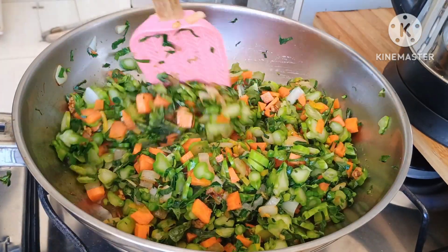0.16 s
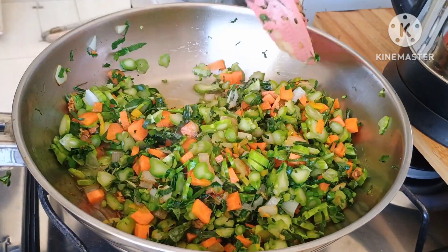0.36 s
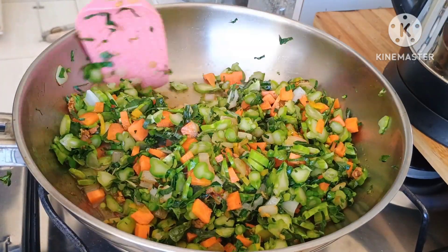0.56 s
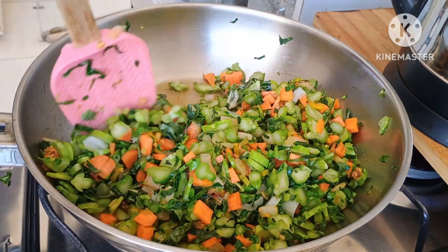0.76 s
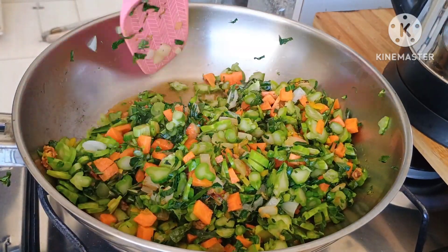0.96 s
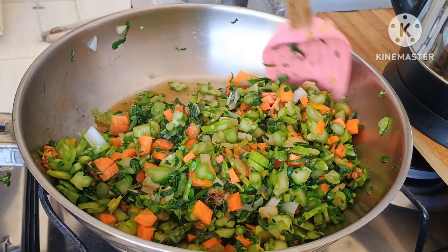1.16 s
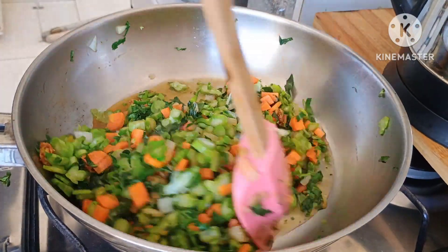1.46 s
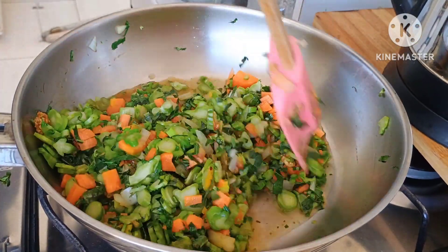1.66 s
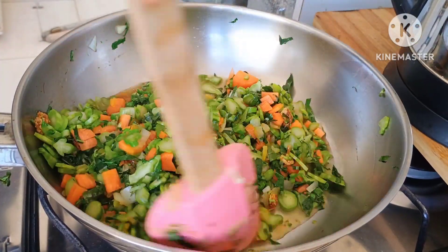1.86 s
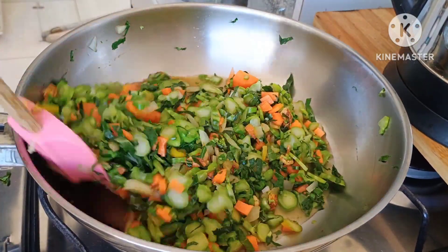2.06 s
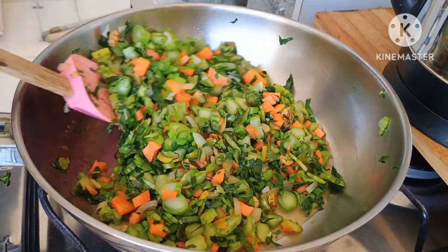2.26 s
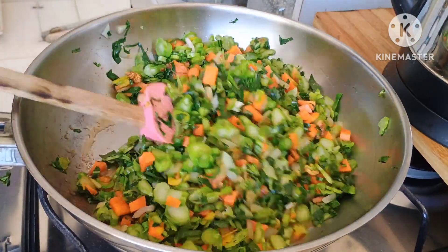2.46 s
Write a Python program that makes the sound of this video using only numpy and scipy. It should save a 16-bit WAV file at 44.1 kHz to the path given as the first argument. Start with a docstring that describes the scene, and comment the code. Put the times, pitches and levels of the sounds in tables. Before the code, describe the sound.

Water sizzling and spitting in a hot pan of vegetables, with a spatula stirring.

```python
"""Water sizzles in a hot steel pan of vegetables: steam bubbles burst, drops spit, the boiling surges. A
spatula turns the wet pieces, scrapes and knocks the steel, and then the sizzle dies away. The pan rings and
drones, and dull thuds sound as it bumps on its stand or the heap flops. Its wall and a small kitchen reflect
the sound into two close microphones, over quiet air and a wavering low hum."""
import sys
import numpy as np
from scipy import signal
from scipy.fft import rfft, irfft
from scipy.io import wavfile
from scipy.ndimage import uniform_filter1d

SR = 44100
rng = np.random.default_rng(int(sys.argv[2]) if len(sys.argv) > 2 else 0)


def wrap_up_sound(samples):
    """Save the sound to the file named by the first command line argument, as 16-bit audio."""
    columns = np.atleast_2d(samples).T
    # keep every value between -1 and 1, then stretch to whole-number steps
    tamed = np.clip(columns, -1, 1)
    steps = np.round(tamed * 32767).astype(np.int16)
    wavfile.write(sys.argv[1], SR, steps)


N = 114660
T = np.arange(N) / SR


def amp(db):
    """Turns decibels into a number to multiply a sound by."""
    return 10 ** (np.asarray(db) / 20)


def unit(x):
    """Scales a signal to an average strength (rms) of 1."""
    return x / np.sqrt(np.mean(x ** 2) + 1e-20)


def level(points):
    """Joins (seconds, dB) points into a loudness curve."""
    return amp(np.interp(T, *np.transpose(points)))


def add(mix, start_s, sound):
    """Mixes a sound in at its start time."""
    part = mix[:, round(start_s * SR):][:, :sound.shape[1]]
    part += sound[:, :part.shape[1]]


def drift(seconds):
    """A random wander; more seconds make it slower."""
    hz = np.fft.rfftfreq(N, 1 / SR)
    return unit(irfft(rfft(rng.standard_normal(N)) / (1 + (2 * hz * seconds) ** 2), N))


def colour(x, points, size=4096):
    """Makes some frequencies stronger than others, following (Hz, dB) points."""
    hz, db = np.transpose(points)
    log_hz = np.log(abs(np.fft.fftfreq(size, 1 / SR)) + 1)
    log_gain = np.log(amp(np.interp(log_hz, np.log(hz), db)))
    response = np.exp(np.conj(signal.hilbert(log_gain)))  # nothing sounds ahead of a click
    taps = np.fft.ifft(response).real[:size // 2]
    return signal.fftconvolve(x, taps[None] / np.linalg.norm(taps), axes=1)[:, :x.shape[1]]


def from_spot(x, wall_s, wall_db, right_lag_s=0.000234, mono_below_hz=1100, size=1024, lead=16):
    """Sound travels from one spot in the pan to both microphones, directly and off the pan wall."""
    n = np.arange(size) - lead
    lag = np.array([[0], [right_lag_s * SR + 0.35 * rng.standard_normal()]])
    direct = np.sinc(n - lag) * np.exp(-((n - lag) / lead) ** 2)
    shared, apart = rng.standard_normal((2, size)) * (n > lead) * np.exp(-abs(n) / (wall_s * SR))
    apart = signal.lfilter(*signal.butter(1, mono_below_hz, "high", fs=SR), apart)
    wall = np.array([shared + apart, np.roll(shared - apart, round(right_lag_s * SR))])
    paths = unit(direct + amp(wall_db) * unit(wall) / np.sqrt(size)) / np.sqrt(size)
    return signal.oaconvolve(x[None], paths, axes=1)[:, :N]


def crackle(per_s, spread_db, hiss, spots=24, flare_db=5.5, flares_per_s=16):
    """Countless tiny pops and some smooth hiss come from spots that flare up and calm down."""
    sizes = amp(spread_db * np.minimum(rng.exponential(1, N), 3.63)) * rng.choice([-1, 1], N)
    pops = unit(sizes * (rng.random(N) < per_s / SR)) + hiss * rng.standard_normal(N)
    where = rng.integers(0, spots, N)
    flares = amp(flare_db * np.minimum(rng.standard_normal((spots, 128)), 1.3))
    out = np.zeros((2, N))
    for k, steps in enumerate(flares):
        flare = unit(np.interp(T * flares_per_s, np.arange(len(steps)), steps))
        out += from_spot(pops * flare * (where == k), wall_s=0.0029, wall_db=6)
    return out


def burst(shape, size=2048):
    """A puff of noise in the pan that fades with the given shape, evened out from bass to treble."""
    noise = rng.standard_normal(len(shape)) * shape
    spectrum = rfft(from_spot(noise, wall_s=0.00095, wall_db=1), 2 * size)
    strength = np.sqrt(uniform_filter1d(abs(spectrum) ** 2, 26) + 1e-12)
    return unit(irfft(spectrum / strength)[:, :size]) / np.sqrt(size)


def tone(hz, waver_hz=3.8):
    """A tone of unsteady pitch."""
    cycles = np.cumsum(hz + waver_hz * drift(seconds=0.056)) / SR + rng.random()
    return np.sqrt(2) * np.sin(2 * np.pi * cycles)


# The tone of the air. Each row: frequency in Hz, relative level in dB.
AIR_COLOUR = [(20, -33), (45, -14), (70, 3), (120, 7.5), (210, -4.5), (310, -3), (500, -13), (1500, -22),
              (15000, -28)]
def kitchen_air(level_db=-60.5):
    """Quiet kitchen air, partly shared by both microphones."""
    air = rng.standard_normal(N) + 0.93 * rng.standard_normal((2, N))
    return amp(level_db) * unit(colour(air, AIR_COLOUR))


# Each row: time in seconds, relative level in dB of the lowest tone, the same for the upper two.
HUM_LEVELS = [(0.0, -47.5, -63.5), (0.22, -50, -57.5), (0.36, -44.5, -59.5), (0.67, -65, -47.5),
              (0.8, -86, -66), (0.9, -51, -58), (1.04, -77, -95), (1.1, -57, -51.5), (1.19, -40.5, -53.5),
              (1.25, -40, -53), (1.29, -62, -46), (1.35, -39.5, -52), (1.43, -43, -50), (1.48, -60, -78),
              (1.66, -58, -82.5), (2.47, -64, -54.5), (2.6, -69, -103)]
def hum(wobble_db=2):
    """Three low tones waver, swell and fade."""
    times, low_db, high_db = np.transpose(HUM_LEVELS)
    out = np.zeros(N)
    for hz, db in [(61, low_db - 6), (117.9, high_db), (169, high_db - 12.5)]:
        out += tone(hz) * amp(np.interp(T, times, db) + wobble_db * drift(seconds=0.038))
    return out


# How hard the water boils. Each row: time in seconds, level in dB.
BOIL_LEVELS = [(0, -49), (.18, -52), (.207, -35), (.225, -29.5), (.28, -25), (.32, -27), (.41, -29.5),
               (.45, -25), (.51, -32), (.535, -24.5), (.56, -29.5), (.655, -28), (.672, -37.5),
               (.686, -35.5), (.70, -27.5), (.745, -23.5), (.795, -30), (.87, -27), (.945, -33),
               (1.022, -29.5), (1.028, -50), (1.04, -46), (1.07, -31), (1.12, -29), (1.24, -22),
               (1.33, -26.5), (1.47, -24), (1.56, -22), (1.665, -20), (1.7, -24), (1.9, -24.5), (1.95, -30),
               (2.0, -28.5), (2.04, -26), (2.056, -30), (2.09, -27), (2.19, -23.5), (2.3, -29.5),
               (2.33, -36.5), (2.49, -46), (2.525, -54.5), (2.6, -58)]
# The tone of the bubbles. Each row: frequency in Hz, relative level in dB.
BUBBLE_COLOUR = [(100, -33), (400, -58.5), (520, -30), (700, -24.5), (790, -21.5), (950, -17), (1080, -23),
                 (1350, -13), (1600, -16.5), (1780, -7), (1950, -10.5), (2230, -3.5), (2500, -12),
                 (3200, -6), (4300, -4), (5300, -1), (6700, 1.5), (7600, -2), (9200, -1.5), (11500, -4.5),
                 (15500, -4)]
def sizzle(flutter_db=1.18):
    """Steam bubbles burst wherever water meets bare hot steel."""
    bubbles = crackle(per_s=9000, spread_db=3, hiss=0.69)
    flutter = amp(flutter_db * drift(seconds=0.0087))
    return unit(colour(bubbles, BUBBLE_COLOUR)) * level(BOIL_LEVELS) * flutter


# The tone of the spray. Each row: frequency in Hz, relative level in dB.
SPRAY_COLOUR = [(100, -50), (1000, -25), (3000, -6.5), (7000, -3.5), (15500, -4)]
def spray(per_s=110, spread_db=6.6, below_boil_db=10.5, spots=12):
    """Fine droplets tick sharply above the boiling, growing louder and softer with it."""
    drops = amp(spread_db * rng.uniform(-1, 1, N)) * (rng.random(N) < per_s / SR)
    where = rng.integers(0, spots, N)
    ticks = sum(from_spot(drops * (where == k), wall_s=0.00093, wall_db=-4) for k in range(spots))
    return amp(-below_boil_db) * unit(colour(ticks, SPRAY_COLOUR)) * level(BOIL_LEVELS)


# Vegetables pushed across the pan. Each row: time in seconds, level in dB.
STIR_LEVELS = [(0, -68), (.2, -52), (.27, -34.5), (.4, -46), (.6, -42.5), (.655, -44), (.67, -66),
               (.70, -51), (.725, -35), (.8, -42.5), (1.02, -37), (1.03, -60), (1.06, -38.5), (1.1, -36.5),
               (1.25, -29.5), (1.33, -33), (1.44, -33), (1.52, -29), (1.67, -26), (1.71, -32), (2.04, -32),
               (2.055, -31.5), (2.11, -34.5), (2.2, -27), (2.33, -34), (2.45, -48.5), (2.52, -64),
               (2.6, -88)]
# The tone of their slipping. Each row: frequency in Hz, relative level in dB.
SLIP_COLOUR = [(80, -28), (200, -12), (350, -13), (520, -13), (640, -7.5), (700, -1), (800, -1), (1030, -4),
               (1230, 2), (1600, -2), (1900, -2.5), (2230, 3.5), (2450, 7), (4000, 5), (6000, 6),
               (9000, -16), (16000, -3.5)]
def stirring(flutter_db=1.5):
    """Wet pieces slip and tumble in clumps, duller than the sizzle."""
    slips = crackle(per_s=2500, spread_db=5, hiss=0.42)
    flutter = amp(flutter_db * drift(seconds=0.0087))
    return unit(colour(slips * flutter, SLIP_COLOUR)) * level(STIR_LEVELS)


# Drops in the oil. Each row: time in seconds, relative level in dB, fade time of the snap in seconds.
BURSTING_DROPS = [(0.2101, -17.5, 0.00033), (0.2308, -14.5, 0.0014), (0.2336, -15, .001),
                  (0.2548, -15, .0003), (0.264, -17, 0.00034), (0.2716, -15.5, .0006), (0.276, -12, 0.001),
                  (0.3118, -16.5, .001), (0.341, -16.5, 0.00053), (.4355, -17, 0.0011), (0.447, -15, .0012),
                  (.5035, -20, 0.00069), (0.5174, -17.5, 0.00058), (0.5288, -13, .0006),
                  (.5626, -12.5, 0.00085), (0.5778, -11.5, 0.00089), (0.613, -15, .0009),
                  (0.6335, -16.5, .0009), (0.648, -32, .0008), (0.6604, -29, .0005), (0.7343, -19, .001),
                  (.824, -24, .0006), (.9655, -22, .0005), (1.0253, -24, 0.00034), (1.0358, -17.5, 0.00022),
                  (1.178, -18, .0005), (1.309, -25, .0007), (1.8564, -17.5, .0007), (1.96, -16, .0003),
                  (2.1914, -21, .0005), (2.361, -28, .0002), (2.4047, -29, .0005), (2.46, -36, .0003),
                  (2.4917, -36.5, 0.00017), (2.555, -42, .0012)]
# The tone of a snap. Each row: frequency in Hz, relative level in dB.
SNAP_COLOUR = [(100, -39), (600, -31), (1200, -15), (2000, -7), (4000, -6), (6500, 5.5), (9000, 0),
               (12500, -0.5), (15500, -2.5)]
def spits(gain_db=16, spatter_db=-34, spatter_s=0.0051, pitch_spread=0.19):
    """Single drops explode with a snap and a short spatter, each pitched a little differently."""
    out, t = np.zeros((2, N)), T[:1536]
    for time_s, db, snap_s in BURSTING_DROPS:
        shape = np.exp(-t / snap_s) + amp(spatter_db) * np.exp(-t / spatter_s)
        pitch = np.exp(pitch_spread * rng.uniform(-1, 1))
        snap = colour(burst(shape), np.array(SNAP_COLOUR) * [pitch, 1])
        add(out, time_s - 0.0005, amp(db + gain_db) * snap)
    return out


# Each row: start in seconds, level in dB, pitch in Hz.
PAN_THUDS = [(0.218, -40, 105), (0.602, -55, 139), (.89, -44.5, 61), (1.363, -34, 109.4),
             (1.483, -41.5, 114), (2.27, -51, 62), (2.292, -50.5, 180), (2.37, -41, 118), (2.41, -42, 127)]
def thuds(rise_s=0.0089, fade_s=0.04):
    """The pan bumps on its stand or the wet heap flops down, each time with one dull, low note."""
    out = np.zeros((1, N))
    shape = np.minimum(T / rise_s, 1) * np.exp(-np.maximum(T - rise_s, 0) / fade_s)
    for start_s, db, hz in PAN_THUDS:
        add(out, start_s, amp(db) * shape * np.sin(2 * np.pi * hz * T)[None])
    return out


# Each row: start in seconds, relative level in dB, fade time of the rub in seconds, bass cut in Hz.
SPATULA_KNOCKS = [(0.9355, -23, .0012, 300), (1.014, -7, 0.0013, 450), (1.0212, -6, 0.0011, 450),
                  (1.0355, -20, 0.00047, 300), (1.2585, -1, 0.0035, 650), (1.6235, -18, 0.0013, 900),
                  (1.637, -8, 0.00099, 900), (1.7125, -8, .001, 1500), (1.7315, -10, .0012, 900),
                  (2.0252, 7, 0.0013, 607), (2.035, 1, 0.006, 350), (2.0429, -5.5, 0.0017, 300),
                  (2.191, 2, .0017, 1800), (2.2118, -3, 0.00076, 700)]
# The tone of a clack. Each row: frequency in Hz, relative level in dB.
CLACK_COLOUR = [(100, -52), (400, -12.5), (1000, -11.5), (1400, -5), (2000, -3), (3000, -1), (3500, 0.5),
                (4300, 0.5), (5000, -1.5), (5900, 5), (7200, -11), (15000, -18)]
def knocks():
    """The spatula clacks and rubs briefly on the food-damped pan; glancing taps carry less bass."""
    out, t = np.zeros((2, N)), T[:1536]
    for start_s, db, rub_s, bass_hz in SPATULA_KNOCKS:
        clack = colour(burst(np.exp(-t / rub_s)), CLACK_COLOUR)
        bass_cut = signal.butter(2, bass_hz, "high", fs=SR)
        add(out, start_s, amp(db) * signal.lfilter(*bass_cut, clack))
    return out


def friction(strokes, tone_points):
    """Grainy rubbing swells and fades with each stroke."""
    push = np.zeros(N)
    for start_s, length_s, db in strokes:
        position = 2 * (T - start_s) / length_s - 1  # runs from -1 to 1 during the stroke
        push += amp(db) * np.sqrt(np.maximum(1 - position ** 2, 0))
    grains = crackle(per_s=1500, spread_db=3, hiss=0.52, spots=4)
    return unit(colour(grains, tone_points)) * push


# Each row: start in seconds, length in seconds, level in dB.
SPATULA_SCRAPES = [(.995, 0.049, -49), (1.21, .04, -48), (1.247, .022, -39), (1.44, 0.14, -34.5),
                   (1.51, .09, -41), (1.59, 0.08, -34.5)]
# The tone of a scrape. Each row: frequency in Hz, relative level in dB.
RASP_COLOUR = [(200, -29), (550, -18), (800, 3.5), (1020, -14), (1250, 10.5), (1420, 3.5), (1700, 0.5),
               (2300, -4), (5500, -13), (14000, -10.5)]
def scrapes():
    """The spatula rasps as it slides over the steel."""
    return friction(SPATULA_SCRAPES, RASP_COLOUR)


# Each row: time in seconds, level in dB.
DRONE_LEVELS = [(1.45, -68), (1.6, -58), (1.88, -55), (2.0, -59), (2.3, -64)]
def pan_drone():
    """The dragging spatula sets off a low drone in the pan, which lingers faintly."""
    start_s = DRONE_LEVELS[0][0]
    return tone(hz=76) * level(DRONE_LEVELS) * (T > start_s)


# Each row: start in seconds, length in seconds, level in dB.
HEAP_SHOVES = [(1.49, .1, -50.5), (1.6, 0.074, -46), (2.3, 0.062, -48.5)]
# The tone of the moving heap. Each row: frequency in Hz, relative level in dB.
HEAP_COLOUR = [(80, -28), (180, -13), (310, 0.5), (480, -2), (900, -16), (2200, -6), (8000, -28)]
def shoves():
    """The wet heap is shoved or drops back with a low rustle."""
    return friction(HEAP_SHOVES, HEAP_COLOUR)


# The pan's own notes. Each row: pitch in Hz, relative level in dB, seconds to fade by 60 dB.
STEEL_NOTES = [(313, 0, 0.086), (542.4, 8.5, 0.12), (703.7, 1.5, 0.17), (928, -5, 0.096), (1217, -17, .1),
               (1350, -1, 0.24), (1473, -2.5, .1), (1774, -7, 0.091), (1871, 4, 0.12), (1983, 0.5, 0.047),
               (2435, -1, 0.053), (3445, 1.5, 0.16), (3474, -7, 0.059), (3888, -7, 0.05), (4090, -1.5, .15),
               (4185, -10, .08), (4240, 0.5, 0.055), (4700, -16, 0.13), (5500, -9, 0.19), (5480, -4, 0.26),
               (6180, -2, 0.044), (6730, -11, 0.16), (8090, -3, 0.15), (9300, -18, 0.22)]
def pan_ring(x):
    """Everything that happens in the pan rings its steel, a little differently at each microphone."""
    t, ringing = T[:8192], 0
    for hz, db, ring_s in STEEL_NOTES:
        damping = np.log(1000) / ring_s
        note = np.cos(2 * np.pi * hz * t + rng.uniform(-1, 1, (2, 1)))
        ringing += amp(db) * 2 * damping / SR * np.exp(-damping * t) * note
    return signal.fftconvolve(x, ringing, axes=1)[:, :N]


def kitchen_echo(x, echo_s=0.12, paths=4, turn_hz=37, size=12000):
    """A small room gives a short wash of echoes; paths take turns, as if the sizzle moved about."""
    t, out = T[:size], np.zeros((2, N))
    fade = np.exp(-np.log(1000) * t / echo_s) * (t > 0.005)
    for k in range(paths):
        tail = unit(rng.standard_normal((2, size)) * fade) / np.sqrt(size)
        share = np.maximum(np.cos(2 * np.pi * (turn_hz * T + k / paths)), 0)
        out += signal.fftconvolve(x * share, tail, axes=1)[:, :N]
    return out


def scene(echo_db=-7.5):
    """Mixes the pan, its room and the low background."""
    pan = sizzle() + spray() + stirring() + spits() + knocks() + shoves() + scrapes()
    pan = (pan + pan_ring(pan)) * amp([[0.18], [-0.18]])  # a touch louder on the left
    echo = amp(echo_db) * kitchen_echo(pan)
    rumble = (hum() + pan_drone() + thuds()) * amp([[-2], [0]])  # softer on the left
    return pan + echo + rumble + kitchen_air()


def record(dry, top_hz=15560):
    """Cuts away the very highest treble."""
    treble_cut = signal.firwin(401, top_hz, window=("kaiser", 9), fs=SR)
    return signal.oaconvolve(dry, treble_cut[None], "same")


dry = scene()
out = record(dry)
wrap_up_sound(out)
```